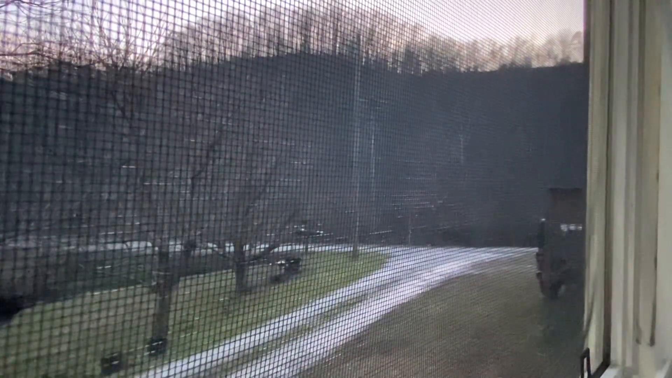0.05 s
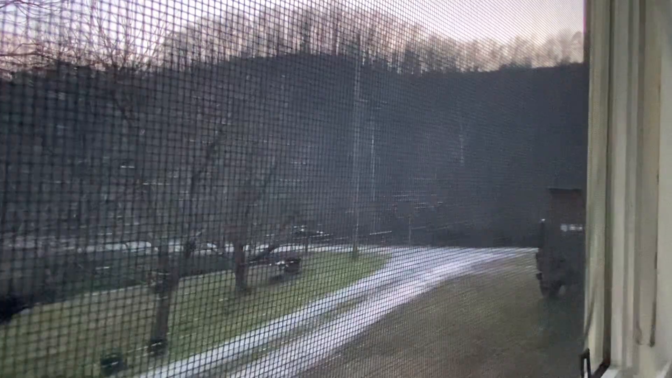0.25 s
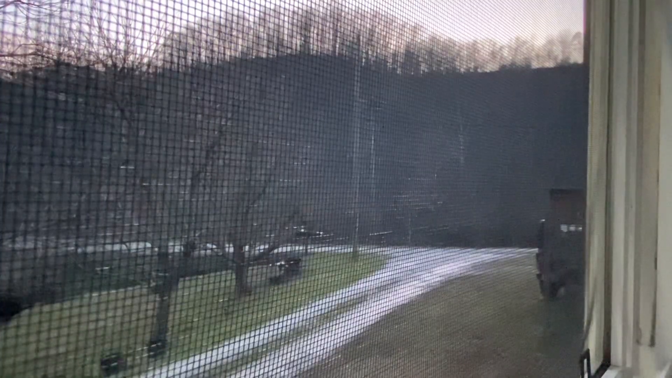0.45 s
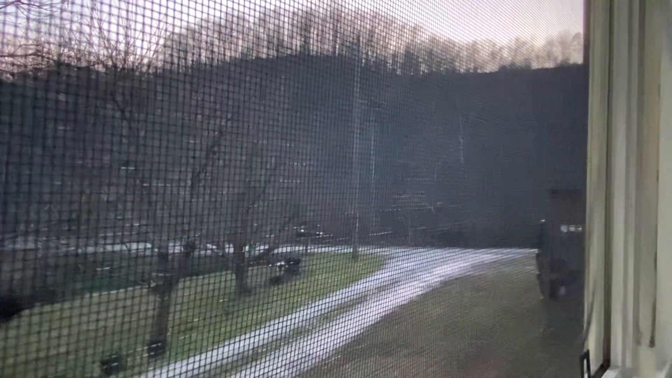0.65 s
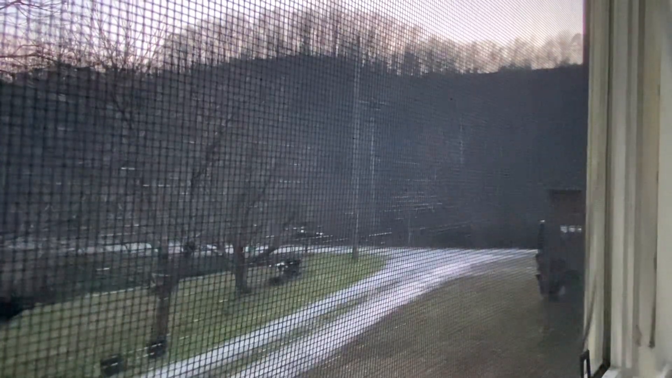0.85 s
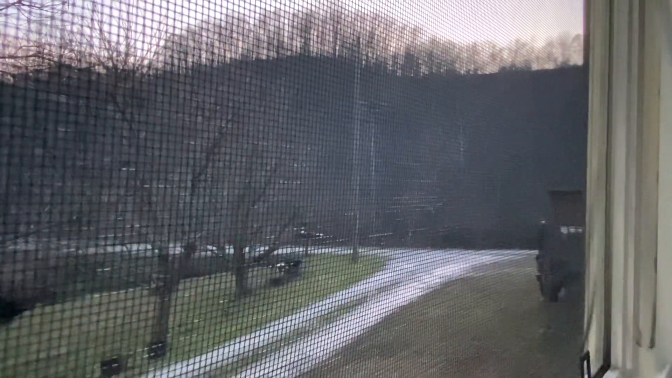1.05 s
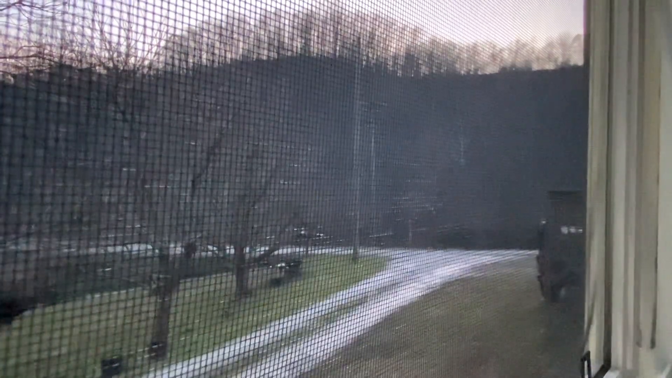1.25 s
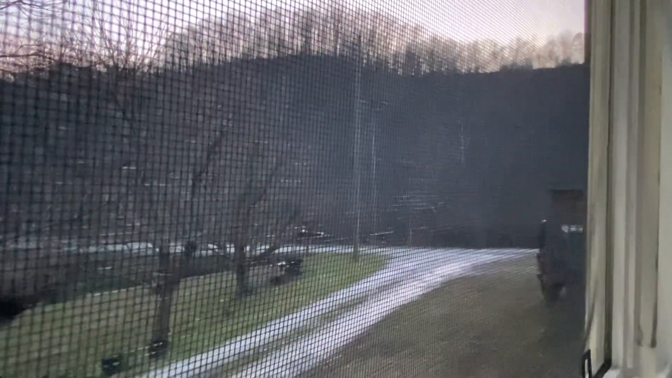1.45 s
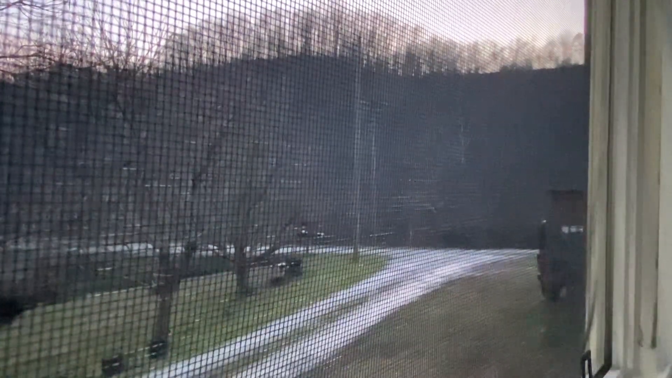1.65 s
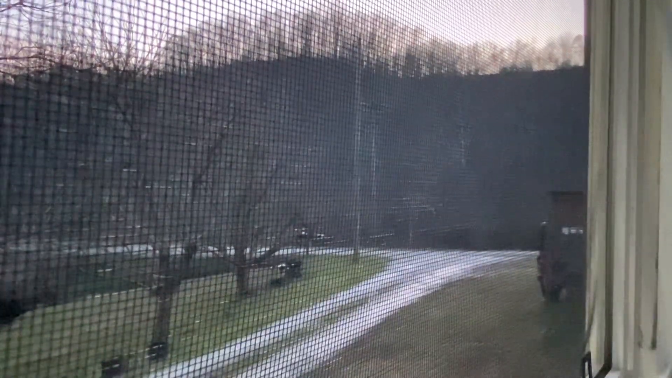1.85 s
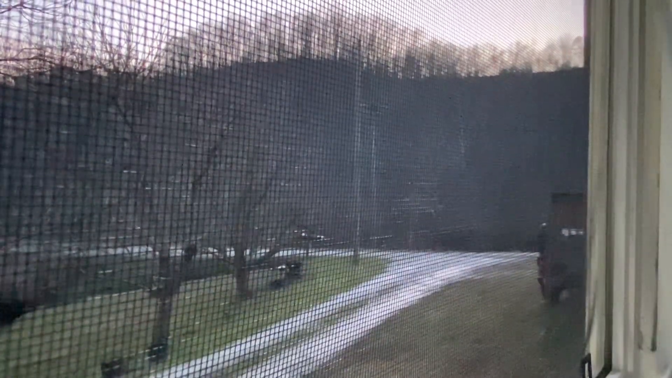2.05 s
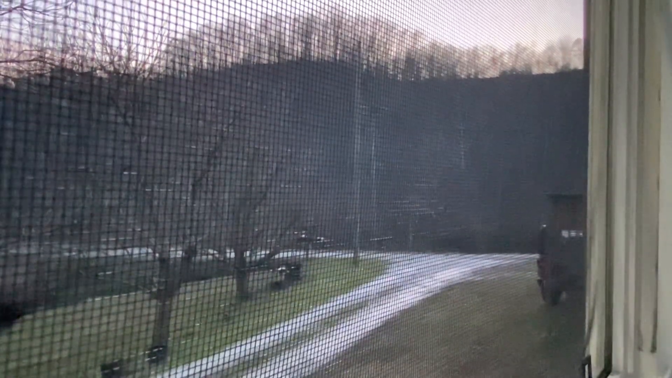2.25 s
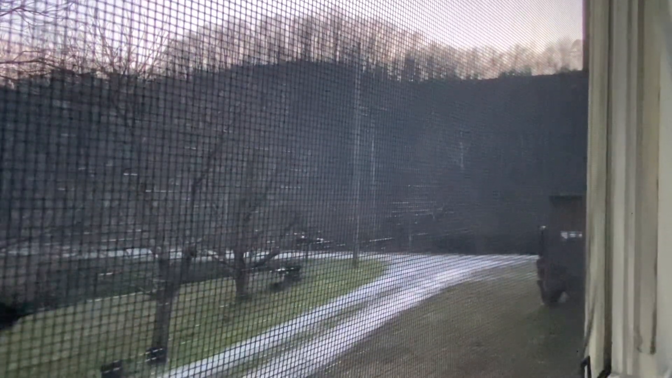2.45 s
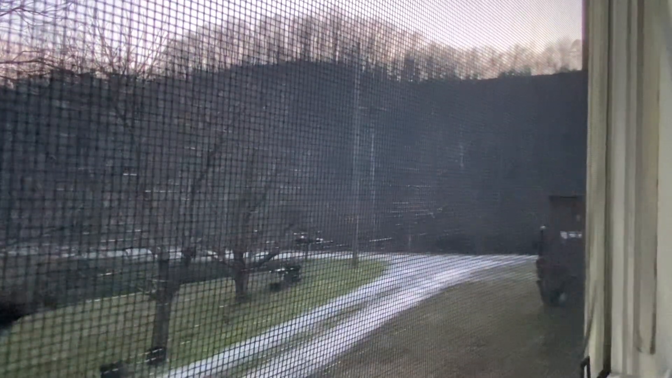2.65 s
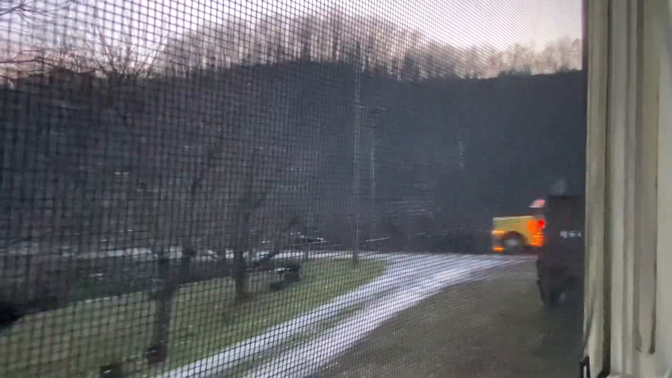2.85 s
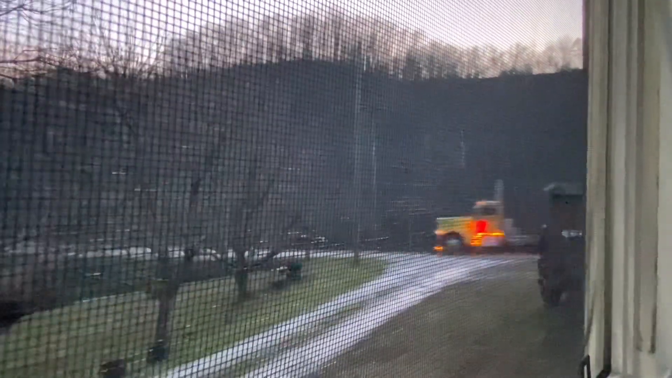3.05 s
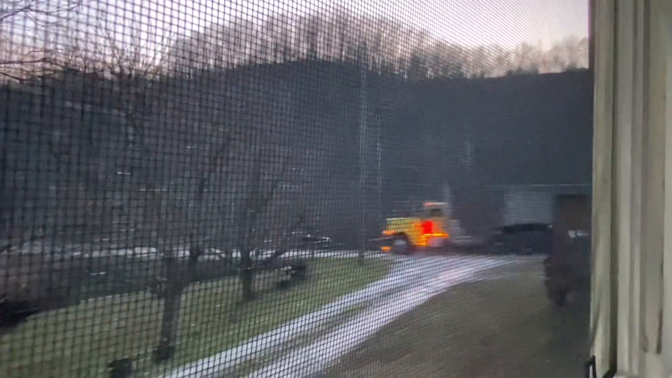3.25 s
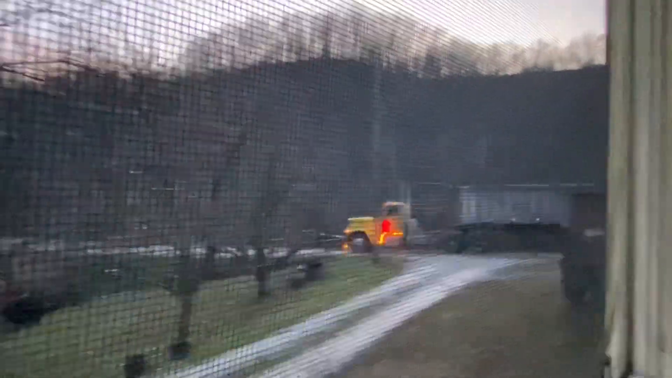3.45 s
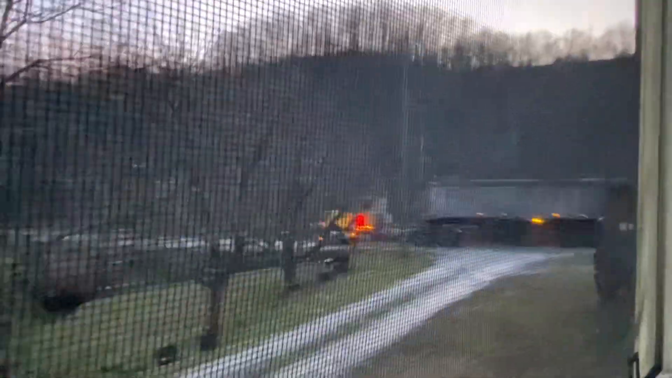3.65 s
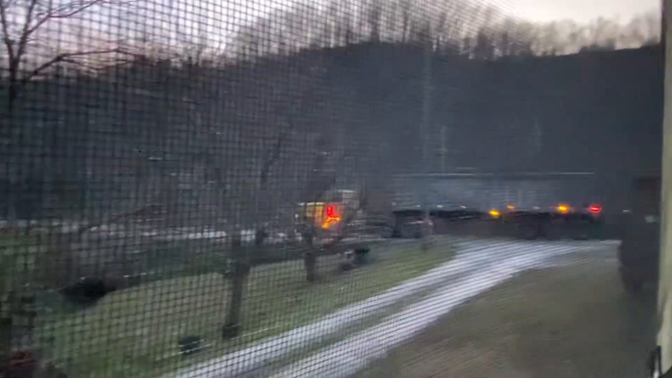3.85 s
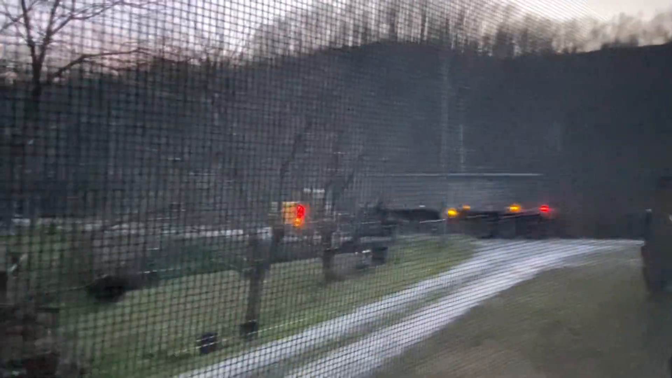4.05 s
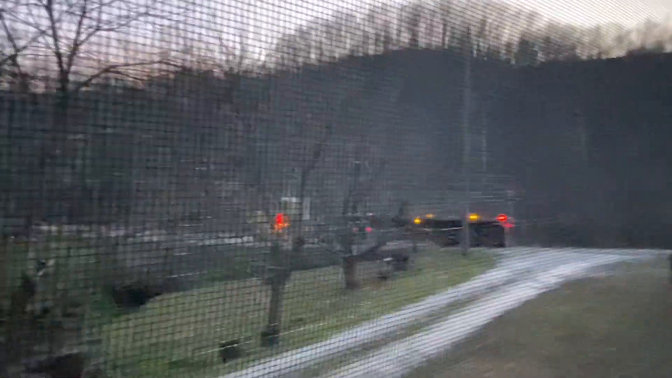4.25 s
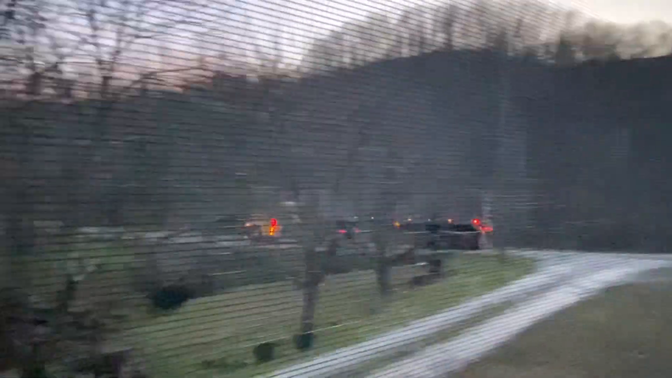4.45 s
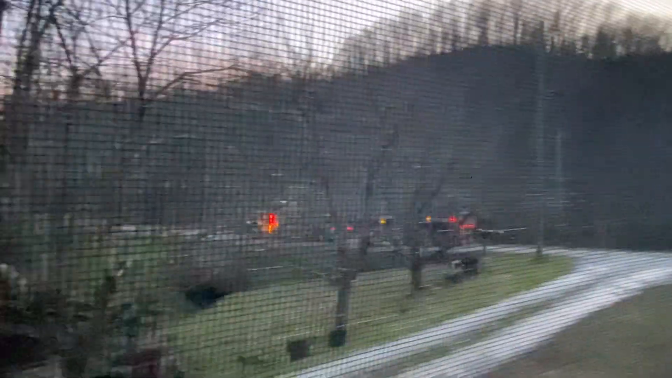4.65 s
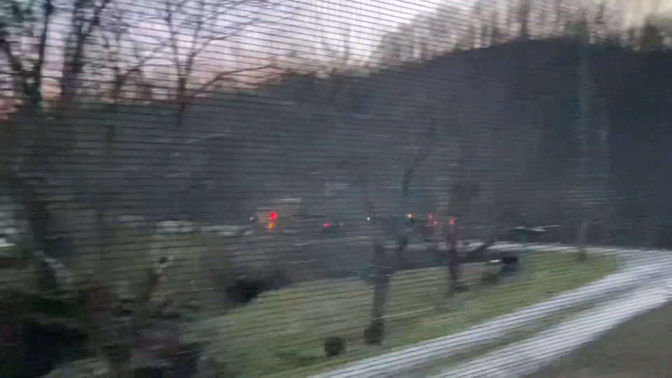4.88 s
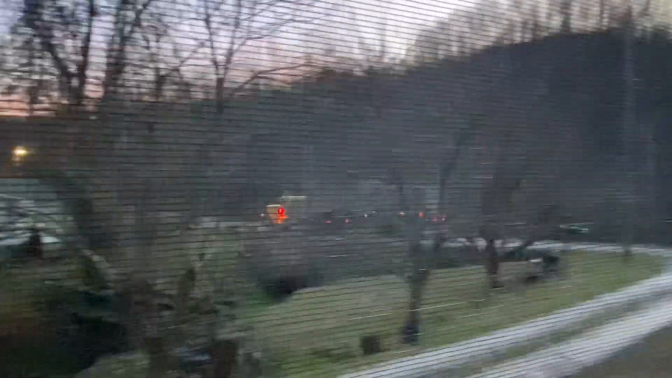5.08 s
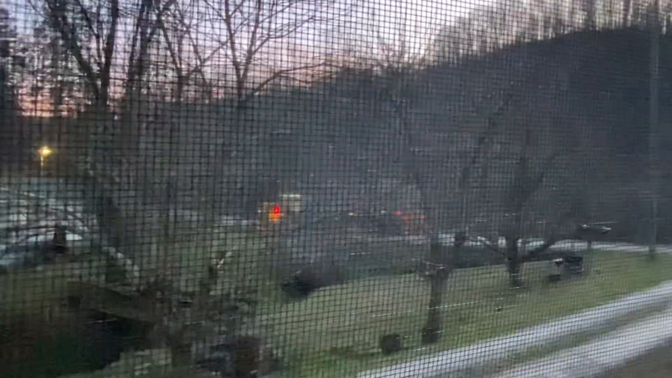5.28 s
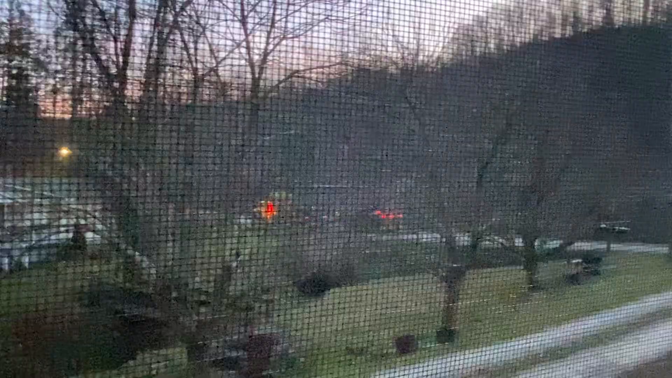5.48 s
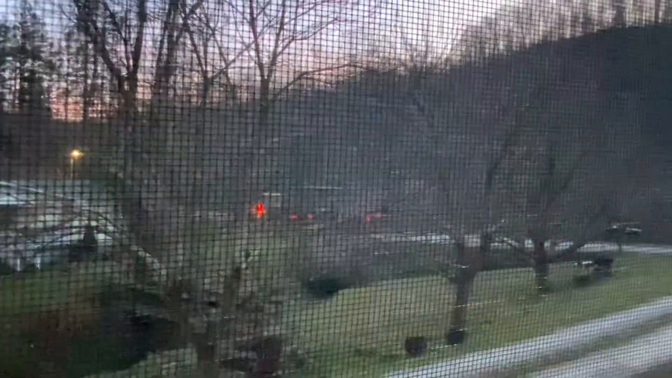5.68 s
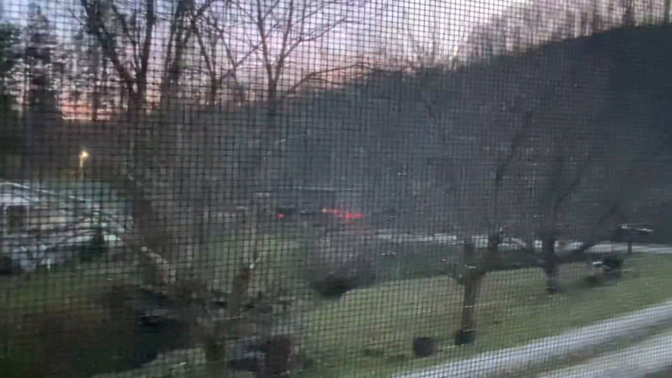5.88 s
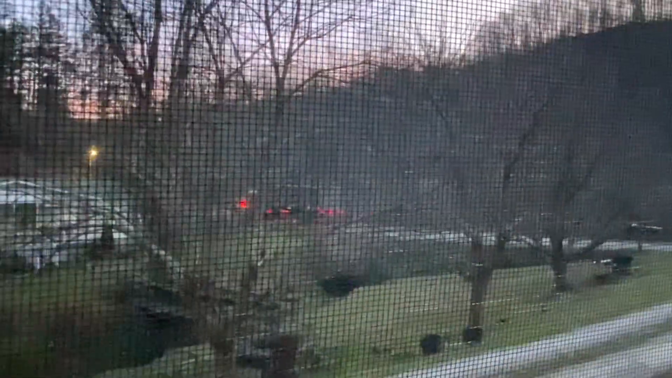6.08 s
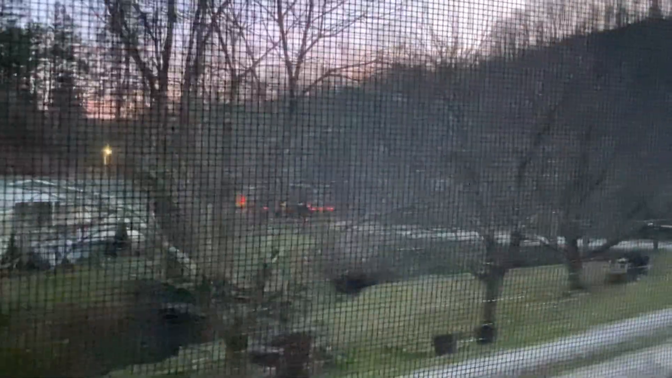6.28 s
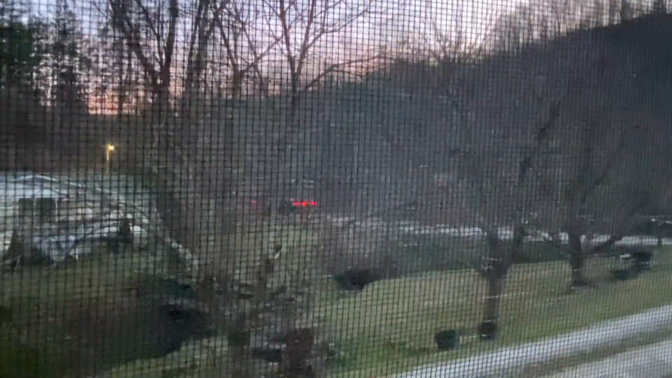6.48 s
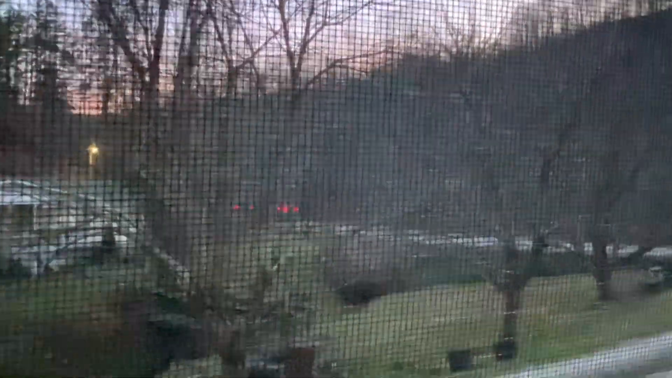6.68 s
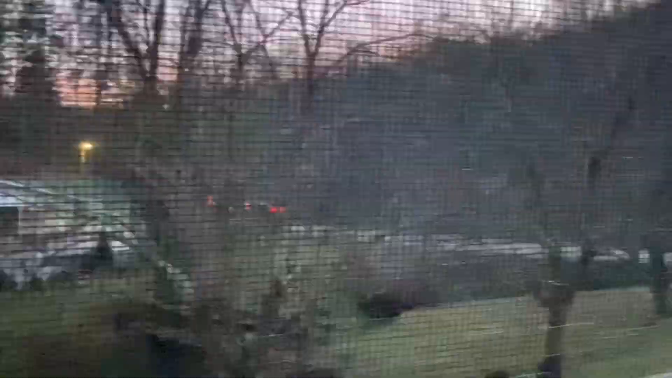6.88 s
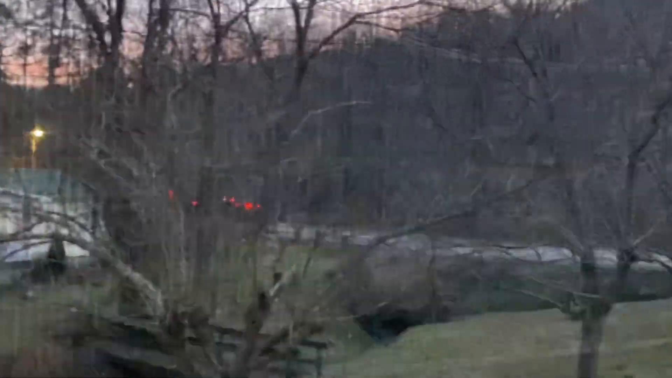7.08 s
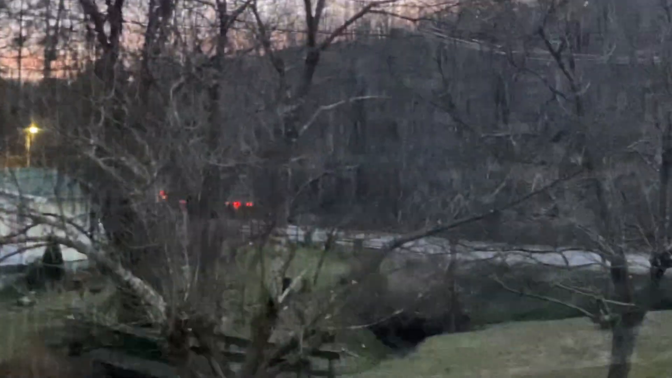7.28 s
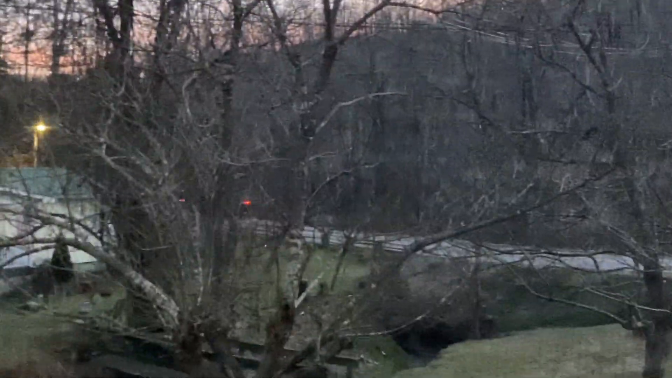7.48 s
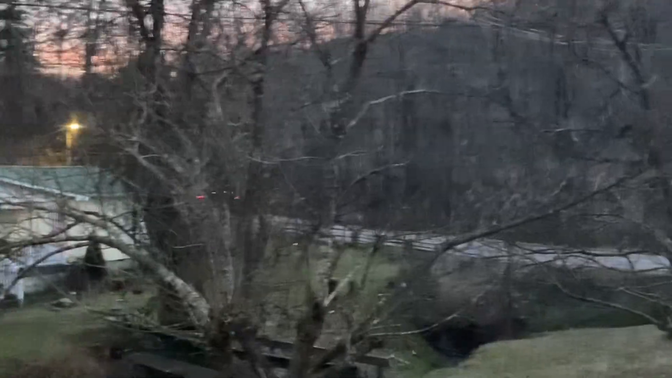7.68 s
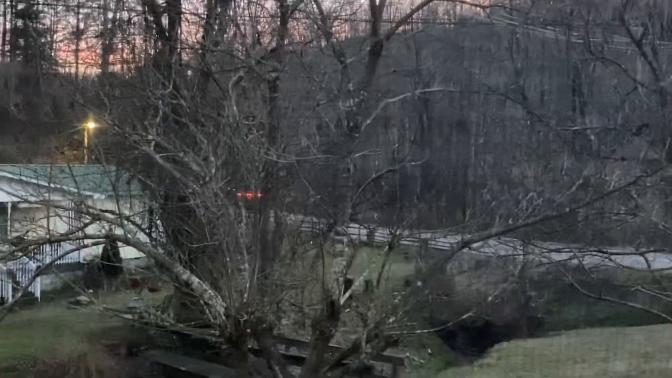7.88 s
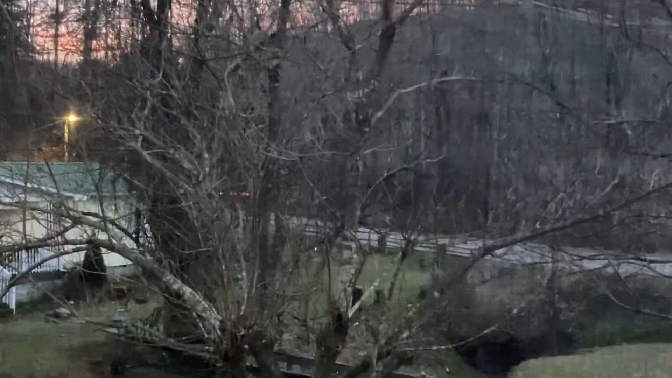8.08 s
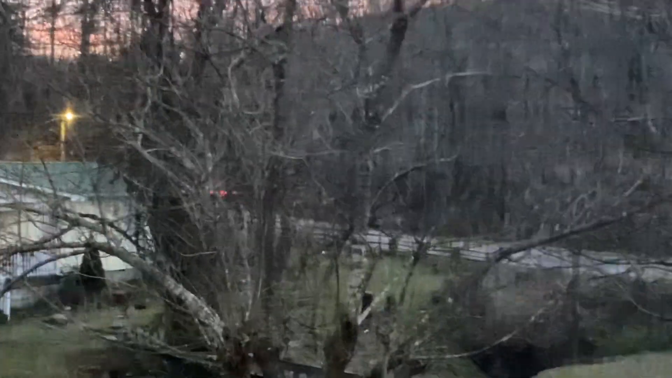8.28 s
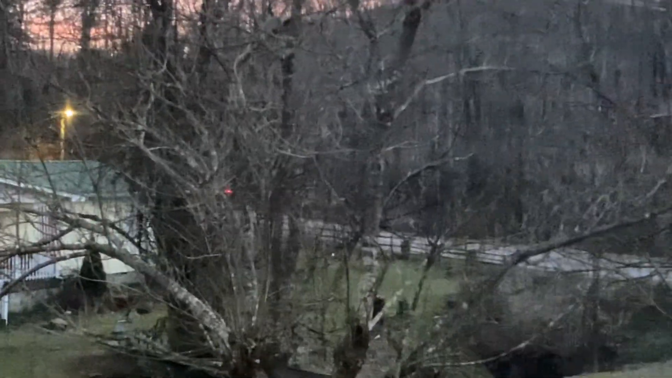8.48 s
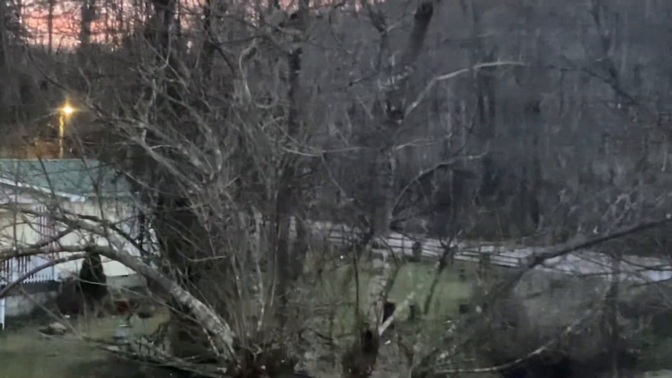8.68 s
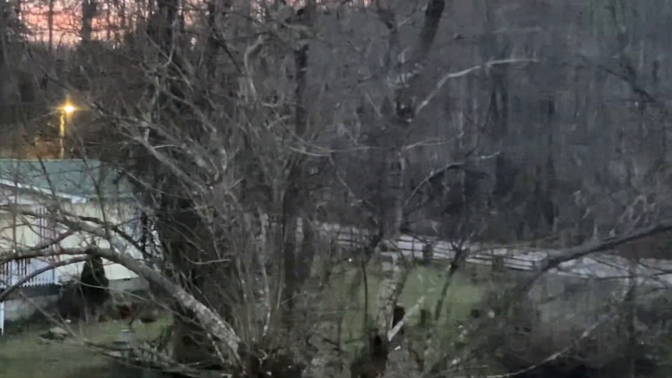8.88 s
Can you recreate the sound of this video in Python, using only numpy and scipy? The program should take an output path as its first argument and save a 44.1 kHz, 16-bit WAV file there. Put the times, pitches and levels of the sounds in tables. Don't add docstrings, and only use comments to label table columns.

```python
import sys
import numpy as np
from scipy import signal
from scipy.fft import rfft, irfft, next_fast_len
from scipy.io import wavfile
from scipy.ndimage import uniform_filter1d, map_coordinates

SR = 44100
rng = np.random.default_rng(int(sys.argv[2]) if len(sys.argv) > 2 else 0)


def boost_factor(decibels):
    exponent = np.asarray(decibels, float) / 20
    return 10 ** exponent


def transcribe(u):
    v = np.clip(np.atleast_2d(u).T, -1, 1)
    q = np.round(v * 32767).astype(np.int16)
    wavfile.write(sys.argv[1], SR, q)


N = 393813
T = np.arange(N) / SR
CYCLE = 6


def unit(x):
    return x / np.sqrt(np.mean(x ** 2) + 1e-20)


def along(points, hz):
    f, v = np.transpose(points)
    return np.interp(np.log(hz + 1), np.log(f + 1), v, left=-120, right=-120)


def curves(rows, t=T):
    s, *cols = np.transpose(rows)
    return [np.interp(t, s, c) for c in cols]


def wobble(rate, count, t=T):
    knots = rng.standard_normal((count, int(N * rate / SR) + 4))
    coarse = t[::1 + len(t) // 10000]
    return np.array([np.interp(t, coarse, map_coordinates(k, [coarse * rate])) for k in knots])


# (time [s], firing rate [Hz])
FIRING_RATE = [(0, 59.55), (1.2, 59.75), (2, 61.63), (2.75, 62.34), (3.25, 63.63), (3.75, 64.85),
               (4.25, 65.24), (4.75, 65.74), (5.3, 66.25), (5.8, 65.95), (6.25, 64.02), (6.9, 63.42),
               (7.8, 61.66), (8.3, 60.25), (8.93, 59.24)]


def truck():
    turns = np.cumsum(curves(FIRING_RATE)[0]) / SR
    body = rumble(turns) + bark(turns) + roar(turns) + hiss(turns)
    return exhaust(turns) + lope(turns) + focused(body) + sheen()


# (time [s], firing tone level [dB], second order level [dB])
PIPE = [(0, -57, -50.5), (1.6, -58, -54), (2.1, -39, -41.5), (2.5, -27.5, -30.5), (2.8, -29, -17),
        (3.2, -21.5, -16.5), (3.5, -23, -19), (4, -17.5, -19), (4.7, -19.5, -18), (4.95, -17, -23.5),
        (5.1, -31.5, -19), (5.3, -18.5, -31.5), (6.15, -29, -31), (6.35, -39.5, -48.5), (7.53, -45, -45),
        (7.62, -33.5, -27), (8.1, -36, -39), (8.93, -34, -51)]
# (time [s], path gained [firing wavelengths],
# level under the firing tone [dB], level under the second order [dB])
SLOPE_ECHO = [(3.25, -2.35, -14, -28), (3.7, -1.35, -10, -22), (4.13, 0, -9, -13), (4.49, 1, -7, -7),
              (4.86, 2, -10, -7), (5.14, 3, -9, -4), (5.42, 4, -15, -5), (5.85, 5, -17, -7),
              (6.4, 6.5, -17, -14)]
# (time [s], level [dB])
FOURTH_ORDER = [(0, -49.5), (1.2, -43), (2, -42), (2.6, -45), (3, -69)]


def exhaust(turns):
    tone_db = np.array(curves(PIPE))
    gained, *echo_db = curves(SLOPE_ECHO)
    drift = 0.55 * wobble(6.9, count=2)
    weak = np.clip((-29.5 - tone_db) / 5, 0, 1)
    fades_db = 5 * (T > 5) * weak * (.5 - wobble(9.7, count=2) ** 2)

    def with_echo(k, offset_cycles):
        wander = drift[k - 1]
        straight = np.sin(2 * np.pi * k * turns + wander)
        echo = np.sin(2 * np.pi * (k * (turns + gained) + offset_cycles) + wander)
        return straight + boost_factor(echo_db[k - 1]) * echo

    tone = boost_factor(tone_db[0] + fades_db[0]) * with_echo(1, .38)
    tone += boost_factor(tone_db[1] + fades_db[1]) * with_echo(2, 0)
    tone += boost_factor(curves(FOURTH_ORDER)[0]) * np.sin(2 * np.pi * 8 * turns / CYCLE + drift[0])
    lean_db = np.interp(T, [0, 2.5, 6.5, 8.93], [3.2, 2.6, 0.72, 0])
    return np.sqrt(2) * tone * boost_factor(np.array([lean_db, -lean_db]) / 2)


# (time [s], level [dB])
HARD_CYLINDER = [(0, -72), (6.1, -59), (6.4, -45), (6.7, -42), (7.05, -36.5), (7.4, -45), (7.7, -46),
                 (8.1, -39), (8.93, -37)]


def lope(turns):
    cycles = (turns - np.interp(8.495, T, turns))[::16] / CYCLE
    k = np.arange(4, 12)[:, None]
    weight = np.exp(-((k - 7.5) / 2.5) ** 2)
    thump = (weight * np.cos(2 * np.pi * k * cycles)).sum(0)
    level_db = curves(HARD_CYLINDER)[0] + 2 * wobble(8, count=1)[0]
    return boost_factor(level_db) * unit(np.interp(T, T[::16], thump))


# (pitch [Hz], level [dB per Hz])
RUMBLE = [(22, -57.5), (36, -5.5), (55, -10.5), (85, -1.5), (110, -1.5), (150, -15.5), (200, -37)]


def rumble(turns):
    lines = orders(turns, RUMBLE, half_db=-7, firing_db=-32, fade_db=3.5, size=64)
    pair = blend(lines, rush(RUMBLE, patchy_db=0.0))
    level_db, side_db = layer("rumble")
    near_db = curves(PASS)[0]
    lumps_db = 2.0 * wobble(7.3, count=1) * np.clip(1.0 + near_db / 25, 0, 1)
    return boost_factor(level_db + lumps_db) * spread(pair, side_db, lagged=bearing())


# (pitch [Hz], level [dB per Hz])
BARK = [(88, -38.5), (150, -4), (172, -8), (204, -5.5), (275, -7.5), (371, -6.5), (487, -12.5), (640, -16),
        (830, -44.5), (1410, -120)]


def bark(turns):
    lines = orders(turns, BARK, half_db=-8.0, firing_db=3, fade_db=4.5, size=24)
    pair = off_ground(blend(lines, rush(BARK, patchy_db=1.5)), 0.17)
    level_db, side_db = layer("bark")
    return boost_factor(level_db) * spread(narrowed(pair, 260), side_db, lagged=bearing())


# (pitch [Hz], level [dB per Hz])
ROAR = [(310, -15.5), (520, -5), (611, -3.5), (699, -1), (784, -3), (911, -2), (1520, -14), (1800, -23),
        (2340, -40), (3960, -120)]


def roar(turns):
    knock = orders(turns, ROAR, half_db=-8.0, firing_db=6.5, fade_db=4, size=16)
    noise = 1.1 * rush(ROAR, patchy_db=1.0)
    pair = puff(turns, 0.2) * (.65 * clean_share() * knock + noise)
    level_db, side_db = layer("roar")
    unsteady_db = 0.6 * wobble(9, count=1)
    return boost_factor(level_db + unsteady_db) * spread(off_ground(pair, 0.062), side_db, lagged=bearing())


# (pitch [Hz], level [dB per Hz])
HISS = [(910, -17.5), (1550, -3.5), (1980, -1.0), (2210, -5.0), (2690, -7.0), (3280, -9.5), (3990, -11.5),
        (5730, -19), (6240, -18.5), (7480, -25.0), (8250, -31.5), (10700, -78),
        (18200, -120)][:-2] + [(8600, -71.0)]


def hiss(turns):
    clatter = .15 * np.exp(-((T - 3.65) / 0.27) ** 2)
    pair = puff(turns, 0.092 + clatter) * rush(HISS, patchy_db=2.0)
    level_db, side_db = layer("hiss")
    side_db = side_db - 2.5 * np.interp(T, [2.3, 2.8, 4, 4.3], [0, 1, 1, 0])
    return boost_factor(level_db) * spread(pair, side_db, lagged=np.interp(T, [4.1, 4.6], [0.01, -.25]))


# (pitch [Hz], level [dB per Hz])
SHEEN = [(9400, -54.5), (9700, -2), (12200, -6.5), (12600, -49), (13500, -45), (13800, -13), (15300, -9),
         (15800, -32), (16200, -67.5)]
# (pitch [Hz], level [dB per Hz])
HALO = [(7450, -45), (7700, -1.5), (10200, -4), (10500, -47), (11600, -46.5), (11900, -12), (14300, -15),
        (14700, -60)]


def sheen():
    zoomed_s = np.maximum(T - 7.6, 0)
    halo_level = boost_factor(layer("halo")[0] - 1.5 * zoomed_s)
    halo = halo_level * rush(HALO, patchy_db=2.5)[0] * [[1], [-1]]
    sheen_level = boost_factor(layer("sheen")[0] - 5 * zoomed_s)
    return halo + (sheen_level + boost_factor(-102)) * rush(SHEEN, patchy_db=3.5)[0]


# (time [s], nearness [dB], engine load [dB])
PASS = [(0, -25, -3), (1.7, -20, -3), (2.14, -16.5, -2.5), (2.4, -10, -1.5), (2.7, -7, 3), (2.95, -4, 2),
        (3.2, -1, -2), (3.55, -0.5, 0.5), (3.9, 0, -0.5), (4.25, -3, 1.5), (4.9, -4.5, 2.5),
        (5.55, -5.5, -0.5), (6.1, -8.5, -1.5), (6.7, -11, -0.5), (7.47, -13.5, 0.5), (7.54, -11, 6.5),
        (8, -13, 5.5), (8.93, -16, 6.5)]
# (time [s], width change [dB])
WIDTH = [(0, 1), (2.3, -4), (3.2, -6), (4.3, -6.5), (5.2, -11), (6.3, -12.5), (8.93, -14)]
LAYERS = {"rumble": (-26, 0.87, 0.56, -16.5, 0.5), "bark": (-25, 0.91, 1.16, -4, 0.75),
          "roar": (-27.5, 1.0267, 0.07, -0.5, 0.66), "hiss": (-36.5, 0.94, -0.22, -1.5, 0.18),
          "sheen": (-59.5, 1.82, -0.45, -29, 0), "halo": (-56.5, 1.5, -0.3, 0, 0)}


def layer(name):
    (near_db, load_db), (width_db,) = curves(PASS), curves(WIDTH)
    nearest_db, per_near, per_load, side_db, share = LAYERS[name]
    return nearest_db + per_near * near_db + per_load * load_db, side_db + share * width_db


def bearing():
    return np.interp(T, [2.1, 2.5, 4.1, 4.6], [0, .35, .35, -.06])


def puff(turns, depth):
    return 1 + depth * np.cos(2 * np.pi * turns + 1.75 * wobble(3, count=1)[0])


def orders(turns, spectrum, half_db, firing_db, fade_db, size):
    slow = T[::SR // 50]
    t, phase = T[::size], turns[::size]
    hz = curves(FIRING_RATE, slow)[0] / CYCLE
    out = np.zeros((2, len(t)))
    for k in range(3, 115):
        db = along(spectrum, k * hz)
        db = db + (half_db if k % 2 else 0) + (firing_db if k % CYCLE == 0 else 0)
        fades = wobble(2.6, count=4, t=slow)
        if db.max() < -40:
            continue
        for ch in range(2):
            level = np.interp(t, slow, boost_factor(db + fade_db * fades[ch]))
            wander = np.interp(t, slow, 1.54 * fades[2 + ch])
            out[ch] += level * np.sin(2 * np.pi * k * phase / CYCLE + wander)
    return unit(signal.resample_poly(out, size, 1, axis=1, padtype="line")[:, :N])


def rush(spectrum, patchy_db):
    _, _, z = signal.stft(rng.standard_normal((2, N)), SR, nperseg=1024)
    field = uniform_filter1d(rng.standard_normal(z.shape[1:]), size=5, axis=0)
    field = uniform_filter1d(field, size=10, axis=1)
    pair = signal.istft(z * boost_factor(patchy_db * unit(field)), nperseg=1024)[1]
    m = pair.shape[1]
    colour = boost_factor(along(spectrum, np.fft.rfftfreq(m, 1 / SR)))
    return unit(irfft(rfft(pair) * colour, m)[:, :N])


# (time [s], first reinforced band [Hz], share of clean shaft orders [0-1])
GROUND = [(0, 385, .45), (2.3, 380, .6), (3, 370, .75), (3.6, 355, .72), (4.2, 330, .7), (4.8, 315, .62),
          (6, 300, .55), (7.4, 300, .4), (7.7, 310, .65), (8.93, 320, .7)]


def off_ground(x, gain):
    late = np.arange(N) - SR / curves(GROUND)[0]
    bounce = np.array([np.interp(late, np.arange(N), c) for c in x])
    return unit(x + gain * bounce)


def clean_share():
    return np.clip(curves(GROUND)[1], 0, 1)


def blend(lines, noise):
    clean = clean_share()
    return np.sqrt(clean) * lines + np.sqrt(1 - clean) * noise


def spread(pair, side_db, lagged):
    share = np.clip(abs(lagged), 0, 1)
    m = next_fast_len(N)
    quarter = irfft(-1j * rfft(pair[0], m), m)[:N]
    side = np.sqrt(1 - share) * pair[1] + np.sign(lagged) * np.sqrt(share) * quarter
    side = boost_factor(side_db) * side
    return np.array([pair[0] + side, pair[0] - side])


def narrowed(pair, corner_hz):
    high = signal.butter(2, corner_hz, "high", fs=SR, output="sos")
    return np.array([pair[0], signal.sosfilt(high, pair[1])])


# (time [s], lasting [s], pitch [Hz], level change [dB])
FOCUS = [(.8, 3.3, 564, 6), (1.73, 0.62, 203, 16.5), (2.35, 0.18, 249, 15), (2.9, 0.15, 390, 4),
         (2.75, .3, 335, -4), (3.75, .2, 270, -4), (3.95, .2, 740, -3), (2.5, .15, 560, 4),
         (2.9, 0.52, 1514, -7.5), (2.83, 0.39, 703, 7), (3.38, 0.16, 150, 13), (3.5, 0.35, 507, 11),
         (3.45, 0.14, 1030, 2.5), (3.6, 0.14, 1940, 8.5), (3.57, 0.13, 4230, 4.5), (3.22, 0.18, 1850, 3.5),
         (.6, .8, 230, 5), (.7, .8, 165, 7), (3.12, 0.086, 730, 4.5), (5.15, 0.17, 775, 5.5),
         (3.56, 0.07, 6400, 6.5), (3.87, 0.25, 357, 6), (3, 0.4, 7460, 8.5), (3.95, 0.24, 926, 5.5),
         (4, 0.8, 407, 6), (4.55, 0.18, 850, 9.5), (4.496, 0.27, 340, 2.5), (5, 1, 209, 6.5),
         (5.34, 0.49, 2000, 4.5), (6.4, 1.3, 1302, 3.5), (5.46, 1.58, 449.5, 9.5), (6.07, 0.24, 296, 6.5),
         (7.8, 1.3, 542, -9.5), (7.2, 0.35, 5170, 11), (8.49, 0.42, 766, 8.5), (7.58, 0.082, 286, 15),
         (3.82, 0.1, 3960, 5), (4.1, 0.18, 3950, 4), (4.48, .06, 3630, 3.5), (7.52, 0.036, 5050, 6),
         (6.55, 0.16, 414, 6.5), (4.4, .15, 204, 9.5), (3.48, .2, 570, 2.5), (8.7, 0.26, 415, 3.5),
         (8.1, 0.5, 319, 5), (7.9, .3, 430, -3), (7.53, .05, 650, 7)]
# (time [s], level change [dB])
CLEAR = [(0, -4.5), (1.5, -2.5), (2.4, -1), (3.05, 1), (3.9, 3.5), (4.6, 1.5), (6.2, -5.5), (7.47, -3),
         (7.56, 3.5), (8.93, 5.5)]
# (time [s], right port hears later by [samples])
LAG = [(0, 18), (1.2, 20), (2.3, 20), (2.55, 0), (8.93, 0)]
# (pitch [Hz], left minus right [dB])
PORTS = [(60, -0.5), (130, -0.5), (290, -1), (640, 0.5), (1410, -2.5), (2400, 0), (4400, 5), (6820, 0.5),
         (15000, -1.5)]
# (pitch [Hz], side level change [dB])
APART_NEAR = [(300, 2), (650, -3), (1000, 0), (1400, 1), (2000, -3.5), (3400, -1.5), (4300, 1), (5100, 2),
              (6000, 2), (6900, -3)]
# (pitch [Hz], side level change [dB])
APART_FAR = [(300, 1), (650, -1), (1200, 1), (2000, -1), (3400, -1), (5100, 1), (6000, 0), (6900, -6)]
# (time [s], folded above [Hz])
FOLD = [(0, 7440), (3.95, 7470), (4.05, 6397), (6.9, 6355), (7, 2060), (8.93, 2106)]


def focused(x):
    hz, t, z = signal.stft(x, SR, nperseg=4096, noverlap=3072)
    s, lasting, centre, db = np.transpose(FOCUS)
    width = 66 * (centre / 1000) ** 1.15
    band = np.exp(-((hz[:, None] - centre) / width) ** 2)
    moment = np.exp(-((t[:, None] - s) / lasting) ** 2)
    lift_db = band * db @ moment.T
    screen = np.exp(-(np.log2((hz + 1) / 4840) / 0.52) ** 2)
    lift_db += np.outer(screen, curves(CLEAR, t)[0])
    lift_db += np.outer(0.3 * (hz / 8000) ** 2, curves(PASS, t)[0] + 9)
    lift_db += ridges(hz, t)

    lagging_hz = hz ** 3 / (hz ** 2 + 210 ** 2)
    late = np.exp(-1j * np.pi * np.outer(lagging_hz / SR, curves(LAG, t)[0]))
    lean = 1.5 + 0.0562 * curves(WIDTH, t)[0]
    lean_db = np.outer(np.interp(hz, *np.transpose(PORTS)), lean)
    left, right = z * boost_factor(lift_db + np.array([lean_db, -lean_db]) / 2) * [late.conj(), late]

    front = np.interp(t, [2.3, 2.6, 4, 4.2], [0, 1, 1, 0])
    near_db = np.interp(hz, *np.transpose(APART_NEAR))[:, None]
    far_db = np.interp(hz, *np.transpose(APART_FAR))[:, None]
    ragged = np.clip(rng.standard_normal(len(t)) - 1, 0, 1.5) * (t > 4)
    below_fold = hz[:, None] < curves(FOLD, t)[0] + 700 * ragged
    mid = (left + right) / 2
    side = (left - right) / 2 * boost_factor(front * near_db + (1 - front) * far_db) * below_fold
    twist = 1.35 * np.exp(-((hz - 5600) / 850) ** 2) * np.cos(2 * np.pi * hz / 900)
    side += 1j * mid * twist[:, None] * (.5 + front / 2) * below_fold
    side += -1j * .35 * mid * (hz[:, None] > 7600)
    return signal.istft(np.array([mid + side, mid - side]), nperseg=4096, noverlap=3072)[1][:, :N]


# (start time [s], end time [s], first pitch [Hz], last pitch [Hz], level change [dB])
RIDGES = [(2.9, 3.2, 755, 676, 4.5), (3.35, 3.95, 1010, 1120, 8.5), (3.4, 4.13, 365, 340, 2),
          (3.3, 4.15, 450, 414, 3.5), (2.9, 3.4, 1250, 1200, 8.5), (4.3, 4.9, 1400, 1680, 5),
          (4.9, 7.5, 1255, 1237, 6), (5.2, 7.5, 925, 932, 5), (4.9, 6.4, 1400, 1470, 7.5),
          (5.5, 6, 1960, 2070, 4.5), (6, 6.8, 2100, 2030, 2.5), (5.4, 7.4, 430, 407, 4),
          (5.4, 6.3, 658, 656, 7), (1.544, 2.2, 570, 585, 4), (7.55, 7.75, 690, 720, 5),
          (7.5, 8, 1060, 1040, 4.5), (8.3, 8.6, 780, 760, 3), (2.6, 3, 690, 895, 6),
          (4.9, 7.1, 3050, 2700, 5), (4.6, 6.4, 2700, 2720, 4), (4.7, 7.6, 2480, 2400, -5),
          (3.55, 3.76, 2300, 2480, 6), (3.4, 3.73, 4600, 4370, 5), (3.72, 3.95, 3900, 3950, 4.5),
          (3.77, 3.85, 3500, 3500, 6), (3.45, 3.3, 6330, 6340, 7), (3.3, 3.6, 5860, 6000, -10),
          (3.72, 3.88, 6230, 6450, -9), (4.38, 4.75, 1680, 1600, 4.5), (5.07, 5.5, 2030, 2000, 4),
          (3.8, 4, 1850, 1720, 5.5)]


def ridges(hz, t):
    low, lift_db = hz[hz < 7000, None], np.zeros((len(hz), len(t)))
    for start, end, first, last, db in RIDGES:
        on = np.clip(np.minimum(t - start, end - t) / 0.075 + .5, 0, 1)
        width = 27 * (first / 1000) ** .6
        centre = np.interp(t, [start, end], [first, last])
        lift_db[:len(low)] += db * on * np.exp(-((low - centre) / width) ** 2)
    return lift_db


# (start time [s], end time [s], first pitch [Hz], last pitch [Hz], level [dB])
SUNG = [(2.65, 3.03, 372, 378, -26), (3.05, 3.6, 379, 385, -33), (2.701, 3.052, 311.3, 314.3, -37),
        (3.3, 3.8, 447, 452, -34), (3.66, 4, 343, 341, -24.5), (3.5, 3.9, 365.7, 364, -33),
        (3.95, 4.1, 407, 407, -28), (4, 4.85, 321, 329.4, -34), (4.35, 4.9, 412, 412, -38),
        (4.95, 5.15, 197.8, 212, -31), (5.3, 5.45, 208, 200.1, -36), (5.4, 5.58, 431, 431, -34),
        (5.82, 6.27, 303, 299.8, -36), (4.45, 4.7, 855, 845, -38), (3.8, 4.1, 925, 935, -34.5)]


def sung():
    out = np.zeros(N)
    t = T[:SR] - .1
    flutter = wobble(14, count=len(SUNG), t=T[:SR])
    for (start, end, first, last, db), shake in zip(SUNG, flutter):
        on = np.clip(np.minimum(t, end - start - t) / 0.072 + .5, 0, 1)
        turns = np.cumsum(np.interp(t, [0, end - start], [first, last])) / SR
        tone = on * boost_factor(db + 2.5 * shake) * np.sin(2 * np.pi * turns + .4 * shake[::-1])
        out[round((start - .1) * SR):][:SR] += np.sqrt(2) * tone
    return out


# (time [s], peak level [dB], ringing pitch [Hz])
KNOCKS = [(2.694, -19, 611), (2.979, -15, 533), (3.143, -15, 727), (3.423, -12, 536), (3.47, -15, 673),
          (3.865, -14, 939), (3.923, -14, 923), (4.201, -19, 651), (4.479, -13, 856), (4.717, -18, 711),
          (5.33, -21, 654), (8.123, -26, 646), (8.321, -23, 740)]
# (time [s], peak level [dB], ringing pitch [Hz])
CLACKS = [
    (3.3019, -24, 1930),
    (3.5009, -19, 1850),
    (3.5493, -19, 1950),
    (3.6496, -21, 1810),
    (3.737, -23, 1710),
]


def knocks():
    return rings(KNOCKS + CLACKS)


# (time [s], peak level [dB], ringing pitch [Hz])
SQUEAKS = [(3.415, -33, 4200), (3.508, -29, 4300), (3.573, -30, 4250), (3.603, -31, 4350),
           (3.637, -31, 4300), (3.652, -30, 4300), (3.738, -29, 3880), (3.783, -33, 3500),
           (3.822, -30, 4050), (3.878, -30, 3820), (4.045, -31, 3950), (3.48, -37, 6320),
           (3.503, -39, 6300), (3.525, -36, 6340), (3.578, -39, 6350)]


def squeaks():
    return boost_factor(2.5) * rings(SQUEAKS)


def rings(blows):
    out, t = np.zeros((2, N)), T[:SR // 10]
    for s, db, hz in blows:
        ring = np.sin(2 * np.pi * hz * t) + .4 * np.sin(2 * np.pi * 1.06 * hz * t)
        lean_db = np.interp(hz, *np.transpose(PORTS)) * np.array([[.5], [-.5]])
        t60_s = .04 * (1000 / hz) ** .2
        decay = boost_factor(db - 1.5 + lean_db - 60 * t / t60_s)
        out[:, round(s * SR):][:, :len(t)] += decay * np.minimum(t / .0015, 1) * ring
    return out


def surge():
    since = np.maximum(T - 7.529, 0)
    start_hz, sag_per_s, t60_s = 677, 51, .05
    turns = start_hz * (1 - np.exp(-sag_per_s * since)) / sag_per_s
    return boost_factor(-19.5 - 60 * since / t60_s) * np.minimum(since / .0012, 1) * np.sin(2 * np.pi * turns)


# (time [s], pitch [Hz], level [dB])
TURBO = [(3.72, 5970, -64), (3.82, 6000, -51), (4, 6075, -51), (4.15, 6110, -52), (4.28, 6070, -50),
         (4.45, 5980, -57), (4.62, 5810, -62), (4.7, 5750, -72)]


def turbo():
    hz, db = curves(TURBO)
    on = (T > TURBO[0][0]) & (T < TURBO[-1][0])
    flutter = wobble(70, count=2)
    level = on * boost_factor(db + 7 - 3.5 * flutter[0] ** 2)
    tone = level * np.sin(2 * np.pi * np.cumsum(hz) / SR + .9 * flutter[1])
    return tone * boost_factor(np.array([[1.5], [-1.5]]))


# (time [s], peak level [dB], time to die away by 60 dB [s], brightness [dB per octave])
TICKS = [
    (1.197, -51, .02, -7),
    (1.2682, -33.5, .024, -8),
    (1.274, -48, .06, -3),
    (1.2844, -45, .025, 1),
    (1.2895, -38, .025, 2),
    (1.297, -58, .2, 4),
]
# (pitch [Hz], level [dB])
SNAP = [(1000, -20), (2000, 0), (5000, -3), (8300, -12), (9100, -45), (10000, -19), (12500, -18),
        (13200, -30), (14200, -22), (15700, -16), (16300, -60)]


def ticks():
    out, t = np.zeros((2, N)), np.arange(SR // 10) / SR
    hz = np.fft.rfftfreq(len(t), 1 / SR)
    for s, db, t60_s, bright_db in TICKS:
        colour = boost_factor(along(SNAP, hz) + bright_db * np.log2(1 + hz / 4000))
        crack = unit(irfft(rfft(rng.standard_normal((2, len(t)))) * colour, len(t)))
        crack = unit(crack + .4 * crack.sum(0))
        decay = boost_factor(db - 6.0 - 60 * t / t60_s) * np.minimum(t / .0017, 1)
        out[:, round(s * SR):][:, :len(t)] += decay * crack
    return out


# (pitch [Hz], level [dB])
HUM = [
    (193.8, -57),
    (384, -50),
]


def hum():
    fade_db = np.interp(T, [0, 1.4, 2.2], [5, 3, -30])
    lag = np.array([[0], [1.9]])
    out = np.zeros((2, N))
    for hz, db in HUM:
        level = boost_factor(db + fade_db + 2.5 * wobble(5.9, count=1))
        out += level * np.sin(2 * np.pi * hz * T + lag * (hz / 385) ** 3)
    return out


def scene():
    return truck() + sung() + knocks() + squeaks() + surge() + turbo() + ticks() + hum()


def low_pass(x):
    return signal.sosfilt(signal.butter(12, 16350, fs=SR, output="sos"), x)


def record(dry):
    soft = dry / (1 + abs(dry / .95) ** 6) ** (1 / 6)
    mix = soft * np.minimum((T[-1] - T) / .001 + .55, 1)
    return low_pass(mix)


dry = scene()
out = record(dry)
transcribe(out)
```